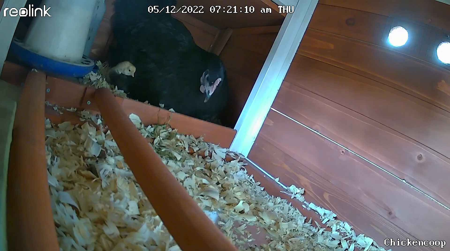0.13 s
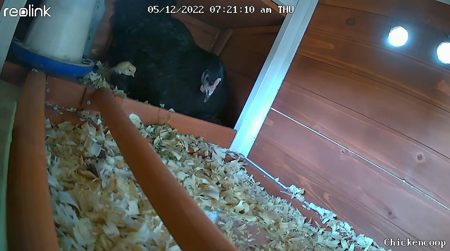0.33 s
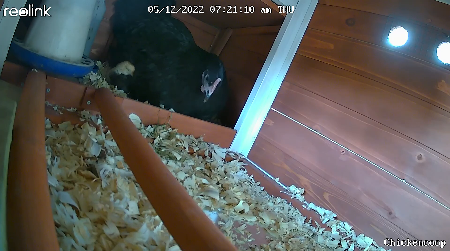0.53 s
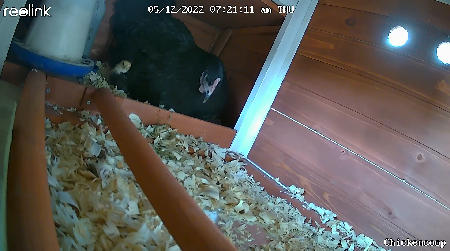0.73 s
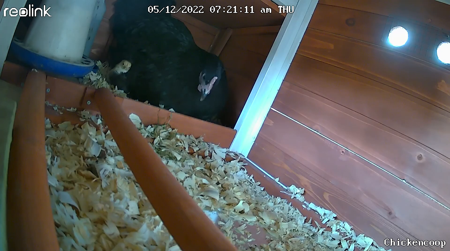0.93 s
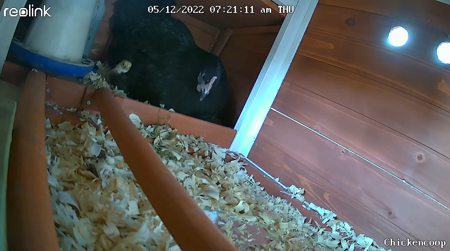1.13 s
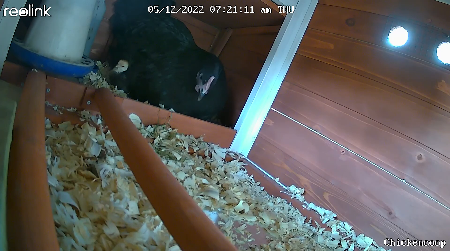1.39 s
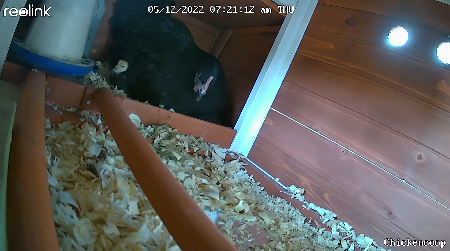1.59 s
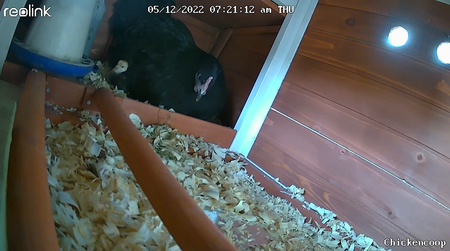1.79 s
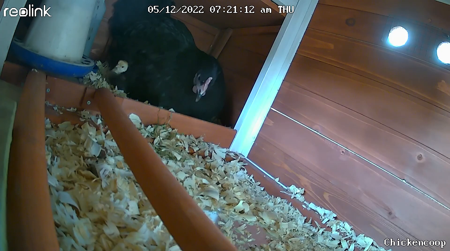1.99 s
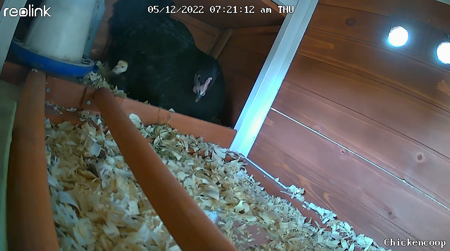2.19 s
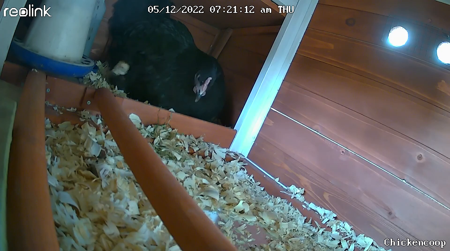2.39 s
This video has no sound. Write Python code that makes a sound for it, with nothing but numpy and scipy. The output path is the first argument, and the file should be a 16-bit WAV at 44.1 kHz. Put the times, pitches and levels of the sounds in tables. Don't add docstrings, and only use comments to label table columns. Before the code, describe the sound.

A hen gives a quick low double cluck at 0.1 s, single clucks near 0.7, 1.1 and 1.55, and a softer double at 2.5, each ringing briefly in the wooden coop. A chick peeps around 0.5, 0.7, 1.8, 2.0 and loudest at 2.25. Feet knock softly; outside, a falling whistle repeats from 0.4 and sparrows twitter. Low wind rumbles; the gritty sound skips at 2.0.

```python
import sys
import numpy as np
from scipy import signal
from scipy.fft import rfft, irfft
from scipy.io import wavfile

SR = 44100
rng = np.random.default_rng(int(sys.argv[2]) if len(sys.argv) > 2 else 0)


def master_out(mix):
    frames = np.transpose(np.atleast_2d(mix))
    ceiling = np.clip(frames, -1, 1)
    pcm = np.round(ceiling * 32767).astype(np.int16)
    wavfile.write(sys.argv[1], SR, pcm)


def invert_db(level):
    return 10 ** (np.asarray(level, dtype=float) / 20)


N = 112455

# start_s, level_db
WIND_STRENGTH = [(0, 3), (.8, 1), (1.5, -2), (1.95, -3), (2.2, -1.5), (2.55, 0.5)]
# pitch_hz, level_db
RUMBLE_SPECTRUM = [(9, -24), (20, -9), (40, 0.5), (68, -3), (85, -10.5), (135, -19), (175, -29.5),
                   (260, -41.5), (500, -110)]
# pitch_hz, level_db
AIR_SPECTRUM = [(150, -42), (250, -8), (329, 3), (690, -10.5), (932, -5.5), (2270, -17), (3390, -18),
                (3750, -11), (5000, -37), (6500, -59.5), (11000, -120)]
RUMBLE_DB, AIR_DB, GUST_DB = -28, -52.5, 3
HUM_HZ, HUM_WIDTH_HZ, HUM_DB = 934, 26, -63

# start_s (within the whistle), length_s, level_db, pitch_hz
WHISTLE_STEPS = [
    (.005, .028, 0.5, 2056),
    (0.041, .03, 2, 2268),
    (0.066, .03, -5.5, 2250),
    (.095, .03, -0.5, 2056),
    (0.145, .03, -1.5, 1930),
    (.165, .06, -2.5, 1837),
    (.245, .04, -1.5, 1620),
]
# start_s, level_db
WHISTLE_REPEATS = [
    (0.382, -64.5),
    (.88, -55.5),
    (1.379, -53),
    (1.881, -53),
]
# pitch_hz, level_db
YARD_ECHOES = [(1605, -2), (1837, 0.91), (2056, -0.4), (2268, 1)]
WHISTLE_EDGE_S, YARD_T60_S = 0.0029, 0.088
# start_s, length_s, start_hz, end_hz, level_db
TWITTER_NOTES = [(1.75, .03, 2950, 3850, -50), (1.733, .035, 3000, 3700, -51),
                 (1.8, 0.074, 3700, 3600, -58.5), (1.858, 0.026, 1500, 2200, -56.5),
                 (0.0016, 0.03, 3000, 3000, -66), (.21, 0.065, 3720, 3700, -77),
                 (0.51, .06, 4200, 3450, -63.5), (.33, 0.1, 3750, 3700, -70.5),
                 (.41, 0.06, 2600, 4800, -73), (0.74, 0.076, 3700, 2980, -67.5),
                 (1.1, 0.062, 3600, 3300, -62.5), (1.085, 0.029, 3400, 4100, -62),
                 (1.3, 0.07, 3200, 3020, -70.5), (1.3, 0.058, 2550, 2520, -68.5),
                 (1.4, 0.032, 3700, 3650, -55.5), (2.1, 0.038, 3250, 3250, -56),
                 (.535, .14, 5550, 5400, -66), (.535, .095, 4300, 4300, -66),
                 (0.69, 0.055, 6850, 7200, -64), (0.76, 0.11, 4770, 4280, -57.5),
                 (.74, 0.12, 3750, 3650, -63.5), (0.91, 0.18, 4640, 4710, -65),
                 (1.062, 0.026, 1500, 3400, -50), (1.2, .03, 5000, 5300, -69.5),
                 (.92, 0.152, 2750, 2750, -67.5), (1.552, .025, 4400, 3900, -60),
                 (2.06, 0.03, 3200, 3600, -65.5), (1.75, .1, 1900, 1800, -63.5),
                 (0.88, 0.1, 5427, 5400, -74), (1.235, 0.24, 3800, 3600, -63),
                 (1.435, 0.064, 4620, 4535, -65.5), (1.574, 0.068, 3200, 3250, -60.5),
                 (1.632, 0.13, 4490, 4610, -66.5), (1.814, 0.094, 4310, 4495, -61),
                 (1.94, 0.091, 4240, 4350, -66.5), (2.063, 0.076, 4320, 4250, -63.5),
                 (2.3, .06, 2700, 2720, -67.5), (2.365, 0.076, 2550, 2750, -67),
                 (2.367, 0.081, 5400, 5350, -69.5), (2.513, .05, 4100, 3700, -57.5)]
TWITTER_WIDTH_HZ = 80

# start_s, level_db (peak), pitch_hz
FOOT_KNOCKS = [
    (0.112, -30.5, 200),
    (0.219, -35.5, 320),
    (0.223, -31, 200),
    (.553, -28, 200),
    (.624, -30, 200),
    (.867, -29, 200),
    (1.80, -40.5, 307.4),
    (2.024, -37.5, 434),
    (2.17, -41, 330),
]
KNOCK_T60_S = 0.14

# start_s, level_db, pitch_hz
CHICK_PEEPS = [
    [(.482, -73.5, 2982), (.49, -52, 3203), (.502, -42.5, 3366), (.53, -40, 3417), (.545, -52.5, 3460),
     (.56, -65, 3445), (.63, -70, 3506)],
    [(.674, -67.5, 3590), (.68, -49.5, 3598), (.7, -43.5, 3570), (.709, -45, 3972), (.716, -46, 3665),
     (.727, -58.5, 3154), (.734, -63.5, 3000)],
    [(1.77, -71, 3697), (1.783, -48.5, 3920), (1.795, -56, 3650), (1.82, -65, 3410)],
    [(1.992, -65, 3346), (2.006, -46, 3307), (2.018, -51, 3144), (2.028, -63.5, 3040)],
    [(2.221, -78, 3816), (2.225, -42, 3898), (2.248, -47.5, 3720), (2.256, -33.5, 3627),
     (2.262, -49.5, 3490), (2.269, -43.5, 3203), (2.276, -63.5, 3106), (2.285, -56.5, 3173),
     (2.293, -74, 3180)],
]
PEEP_OCTAVE_DB, PEEP_WAVER, PEEP_ROOM_DB, PEEP_T60_S = -30, 0.004, -13.5, 0.3

# start_s, length_s, level_db, start_hz, end_hz
HEN_CLUCKS = [
    (0.107, 0.017, -16.5, 585, 664),
    (.128, .011, -14.5, 565, 521),
    (0.6729, .029, -13.5, 570, 524.5),
    (1.079, 0.03, -13.5, 586, 526),
    (1.545, .031, -13.5, 563, 519.7),
    (2.5, 0.026, -17.5, 542.6, 452),
    (2.532, 0.0081, -20.5, 555, 637),
]
# pitch_hz, level_db, t60_s
COOP_RINGS = [(200, 8, .12), (330, -2, 0.09), (441.7, -10.5, 0.12), (532.6, -28, 0.075), (665, -14, 0.23),
              (920, -40.5, 0.13)]
SWELL_POWER, SWELL_TURN, EFFORT_HZ = 1.23, 1.23, 74
RELEASE_S, OCTAVE_DB, CLUCK_WAVER = 0.003, -26.5, 0.013
GULP_DB, GULP_S, GULP_HZ_PER_S = -15.5, 0.012, 11100

# start_s, pitch_hz
HISS_CEILING = [(0, 1750), (.165, 2600), (.4, 2700), (.46, 3400), (.635, 1750), (.675, 2500), (.83, 1750),
                (.86, 2400), (1.06, 3800), (1.12, 2150), (1.2, 2300), (1.43, 3800), (1.53, 2400),
                (1.575, 1250), (1.62, 3700), (1.725, 1750), (1.8, 3800), (2.05, 3100), (2.1, 3800),
                (2.255, 1750), (2.31, 2100), (2.39, 1750), (2.44, 2600), (2.5, 3600)]
FRAME = 1411
GATE_FROM_HZ, GRIT_DB, FAINTEST_DB = 1180, -23.5, -101
GATE_DB, SPARE_DB, GATE_CHANCE_DB = 5.3, 5, 5
# start_s, level_db
TICKS = [
    (.113, -52),
    (0.128, -53.5),
    (.145, -55),
]
GLITCH_S, SKIPPED_S = 2.0209, 0.067
GLITCH_DB, GLITCH_FALL_S, GLITCH_HZ = -28, 0.0091, 434
OPENING_DB, OPENING_S, OFFSET = -21, 0.008, 0.0028


def at_hz(points, hz):
    points_hz, db = np.transpose(points)
    return np.interp(np.log(hz + 1), np.log(points_hz), db)


def rms_one(x):
    return x / np.sqrt(np.mean(x ** 2) + 1e-20)


def drift(rate):
    knots = rng.standard_normal(int(N / SR * 400) + 2)
    return np.interp(np.arange(N) / SR * rate, np.arange(len(knots)), knots)


def ring(x, hz, t60):
    r = invert_db(-60 / (t60 * SR))
    w = 2 * np.pi * hz / SR
    return signal.lfilter([(1 - r * r) / 2, 0, (r * r - 1) / 2], [1, -2 * r * np.cos(w), r * r], x + 1e-18)


def coloured(spectrum):
    hz = np.arange(N // 2 + 1) * SR / N
    white = rfft(rng.standard_normal(N))
    return rms_one(irfft(white * invert_db(at_hz(spectrum, hz)), N))


def tone(gain, hz, octave_db):
    phase = 2 * np.pi * np.cumsum(hz) / SR
    return gain * (np.sin(phase) + invert_db(octave_db) * np.sin(2 * phase))


def glide(rows, t, octave_db, waver):
    s, db, hz = np.transpose(rows)
    gain = np.sqrt(2) * invert_db(np.interp(t, s, db, left=-200, right=-200))
    pitch = np.interp(t, s, hz) * (1 + waver * drift(150))
    return tone(gain, pitch, octave_db)


def wind_and_air(t):
    hum = rms_one(ring(rng.standard_normal(N), HUM_HZ, 2.2 / HUM_WIDTH_HZ))
    wind_db = np.interp(t, *np.transpose(WIND_STRENGTH))
    rumble = invert_db(RUMBLE_DB + wind_db + GUST_DB * drift(1.5)) * coloured(RUMBLE_SPECTRUM)
    hiss = invert_db(AIR_DB + 0.49 * wind_db) * coloured(AIR_SPECTRUM)
    return rumble + hiss + invert_db(HUM_DB) * hum


def far_whistle(t):
    clock = t + SKIPPED_S * (t > GLITCH_S)
    whistle = 0
    for s, db in WHISTLE_REPEATS:
        for at, length, note_db, hz in WHISTLE_STEPS:
            to_edge = np.minimum(clock - s - at, s + at + length - clock)
            gate = np.clip(to_edge / WHISTLE_EDGE_S + 0.5, 0, 1)
            whistle = whistle + invert_db(db + note_db) * gate * np.sin(2 * np.pi * hz * t)
    whistle = whistle * invert_db(2.5 * drift(70))
    echoes = sum(invert_db(db - 5) * ring(whistle, hz, YARD_T60_S) for hz, db in YARD_ECHOES)
    return invert_db(-6) * whistle + echoes


def sparrows(t):
    blur = signal.butter(3, [15, TWITTER_WIDTH_HZ], "band", fs=SR, output="sos")
    out = 0
    for s, length, start_hz, end_hz, db in TWITTER_NOTES:
        u = (t - s) / length
        gate = np.clip(np.minimum(u, 1 - u) * length / 0.023 + 0.5, 0, 1)
        flutter = 0.87 + rms_one(signal.sosfilt(blur, rng.standard_normal(N)))
        gain = invert_db(db + 0.72 * drift(30)) * gate * flutter
        out = out + tone(gain, start_hz + (end_hz - start_hz) * np.clip(u, 0, 1), -94)
    return out


def foot_knocks(t):
    out = 0
    for s, db, hz in FOOT_KNOCKS:
        fade = invert_db(db - 60 * np.abs(t - s) / KNOCK_T60_S)
        attack = np.clip((t - s) / 0.0032, 0, 1)
        out = out + fade * attack * np.sin(2 * np.pi * hz * (t - s))
    return out


def chick(t):
    peeps = sum(glide(rows, t, PEEP_OCTAVE_DB, PEEP_WAVER) for rows in CHICK_PEEPS)
    k = np.arange(SR // 3)
    tail = rng.standard_normal(len(k)) * invert_db(-60 * k / SR / PEEP_T60_S)
    tail = tail / np.sqrt(np.sum(tail ** 2))
    return peeps + invert_db(PEEP_ROOM_DB) * signal.fftconvolve(peeps, tail)[:N]


def hen(t):
    voice = 0
    for s, length, db, start_hz, end_hz in HEN_CLUCKS:
        u = np.clip((t - s) / length, 0, 1)
        after = np.clip(t - s - length, 0, 0.03)
        held = np.clip(1 - after / RELEASE_S, 0, 1)
        turn = min(SWELL_TURN + abs(end_hz - start_hz) / EFFORT_HZ, 3)
        swell = np.sin(turn * u) ** SWELL_POWER
        gulp = invert_db(GULP_DB) * (1 - held) * np.clip(1.6 - after / GULP_S, 0, 1)
        gain = invert_db(db) * swell * (held + gulp)
        hz = start_hz + (end_hz - start_hz) * u ** 2.1 - GULP_HZ_PER_S * after
        voice = voice + tone(gain, hz * (1 + CLUCK_WAVER * drift(100)), OCTAVE_DB - 30 * (1 - u))
    coop = 0
    for k, (hz, db, t60) in enumerate(COOP_RINGS):
        coop = coop + invert_db(db + 14.5) * ring(voice, hz, t60) * (-1) ** k
    return voice + coop


def scene():
    t = np.arange(N) / SR
    outside = wind_and_air(t) + far_whistle(t) + sparrows(t)
    return (outside + foot_knocks(t) + chick(t) + hen(t))[None]


def band_gate(x):
    hz, s, z = signal.stft(x, SR, nperseg=2 * FRAME, noverlap=FRAME, boundary="even")
    start, top_hz = np.transpose(HISS_CEILING)
    top_hz = top_hz[np.clip(np.searchsorted(start, s) - 1, 0, None)]
    grit = np.exp(2j * np.pi * rng.random(z.shape))
    edges = GATE_FROM_HZ * 2 ** (np.arange(22) / 8)
    for low, high in zip(edges, edges[1:]):
        band = (hz >= low) & (hz < high)
        level = 10 * np.log10(np.mean(np.abs(z[band]) ** 2, axis=0) + 1e-20)
        usual = max(np.percentile(level, 25), FAINTEST_DB)
        chance = np.repeat(rng.standard_normal(len(level)), 3)[:len(level)]
        luck_db = GATE_CHANCE_DB * chance * (high <= top_hz) * min(low / 2000, 1) ** 2
        margin = level - usual - np.where(high > top_hz, GATE_DB, -SPARE_DB) + luck_db
        for at, length, start_hz, end_hz, db in TWITTER_NOTES:
            now_hz = np.interp(s, [at, at + length], [start_hz, end_hz])
            margin[(now_hz >= low) & (now_hz < high) & (s > at) & (s < at + length)] = 9
        z[band] += invert_db(GRIT_DB) * np.abs(z[band]).max(axis=0) * grit[band]
        z[band] *= 1 / (1 + np.exp(-5 * np.clip(margin, -9, 9)))
    z[hz >= edges[-1]] = 0
    return signal.istft(z, SR, nperseg=2 * FRAME, noverlap=FRAME)[1][:N]


def roll_off(x):
    return signal.sosfilt(signal.butter(12, 16000, fs=SR, output="sos"), x)


def record(dry):
    t = np.arange(N) / SR
    since = t - GLITCH_S
    fall = (since > 0) * np.exp(-np.abs(since) / GLITCH_FALL_S)
    skip = invert_db(GLITCH_DB) * fall * np.cos(2 * np.pi * GLITCH_HZ * since)
    ticks = sum(invert_db(db) * np.exp(-np.abs(t - s) / 0.0001) for s, db in TICKS)
    gated = band_gate(dry[0])
    opening = (invert_db(OPENING_DB) + gated[0]) * np.exp(-(t / OPENING_S) ** 2)
    mix = gated + skip + ticks - opening + OFFSET
    return roll_off(mix[None])


dry = scene()
out = record(dry)
master_out(out)
```